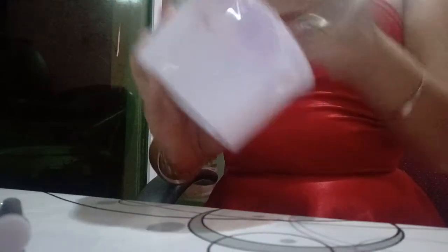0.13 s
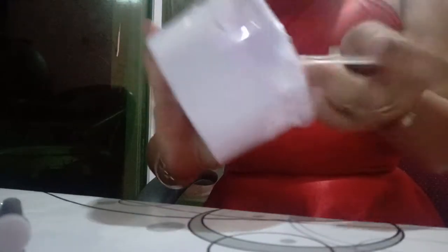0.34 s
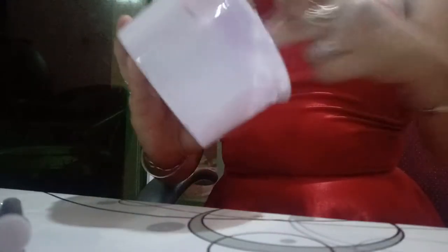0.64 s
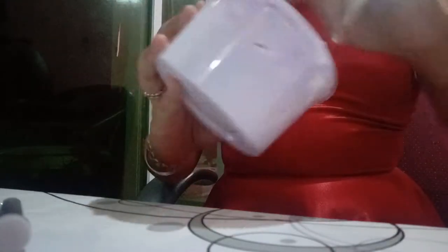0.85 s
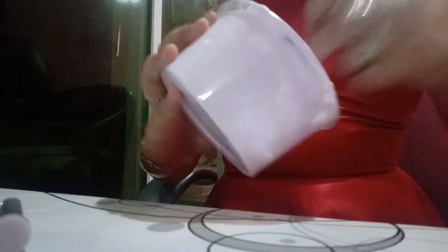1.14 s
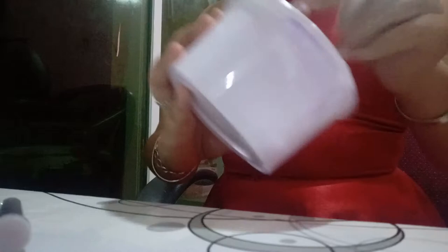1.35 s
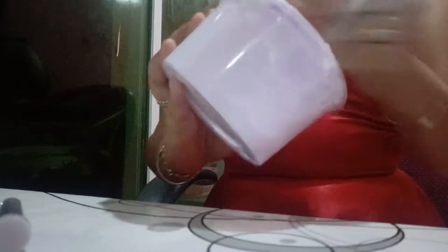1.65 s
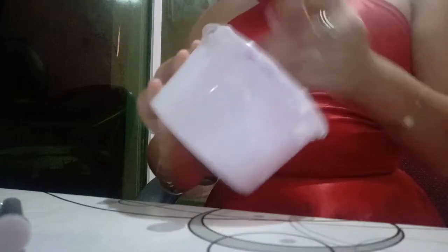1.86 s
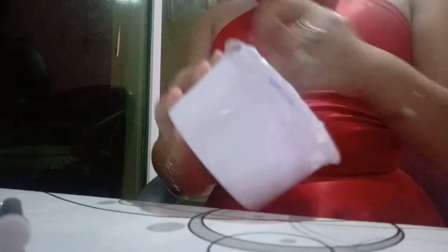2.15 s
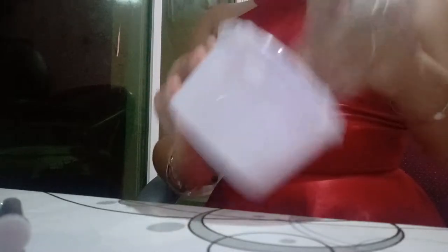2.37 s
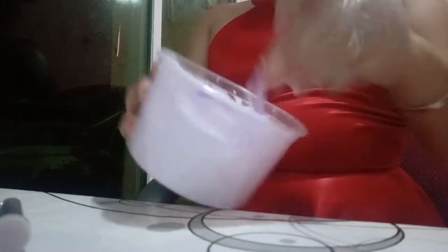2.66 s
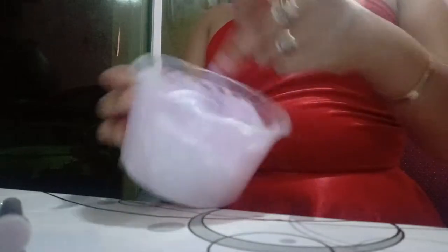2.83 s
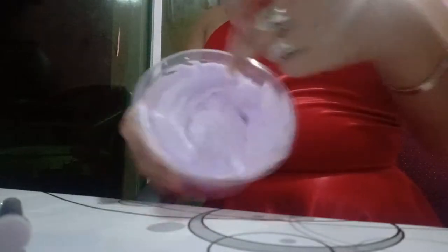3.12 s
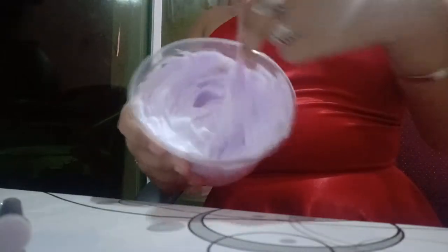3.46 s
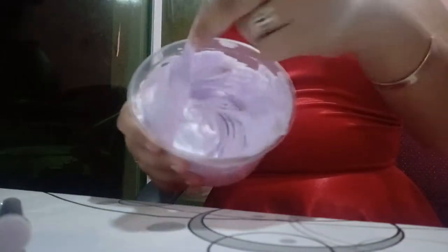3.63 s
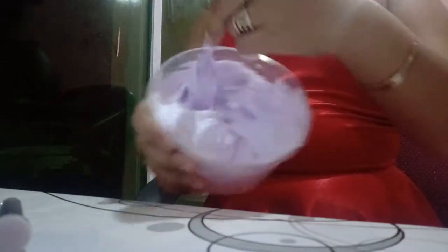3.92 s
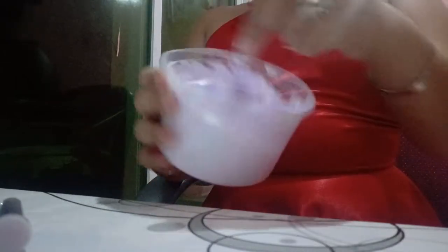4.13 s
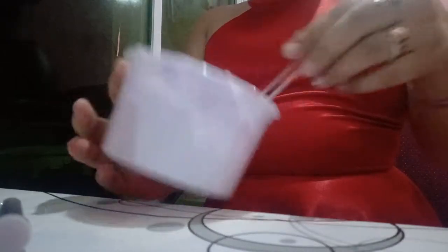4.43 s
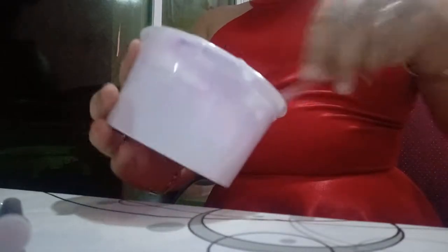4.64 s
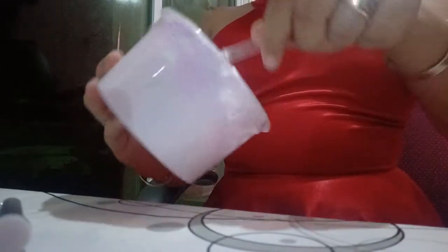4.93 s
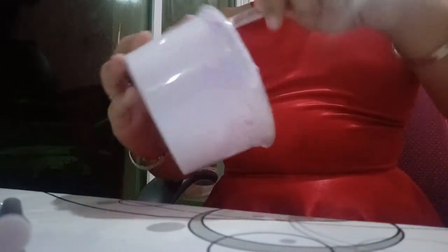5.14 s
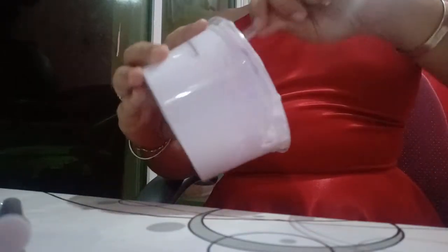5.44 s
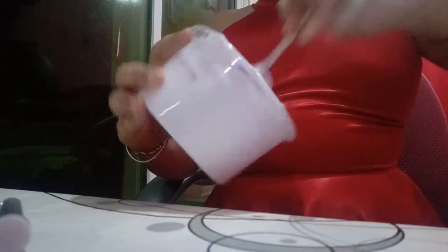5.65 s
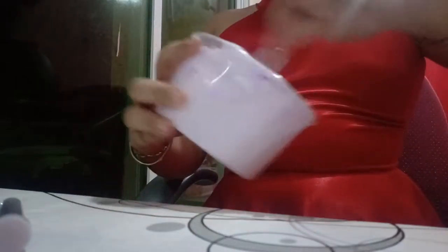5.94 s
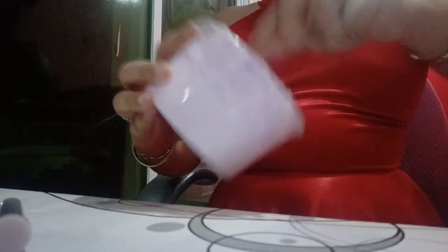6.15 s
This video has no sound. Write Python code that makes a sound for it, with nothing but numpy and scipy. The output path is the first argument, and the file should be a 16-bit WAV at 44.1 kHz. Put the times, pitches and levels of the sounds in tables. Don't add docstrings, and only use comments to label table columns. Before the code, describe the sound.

Close to a phone in a small room, a plastic spoon works sticky slime in a thin tub. Gentle dragging crackle and ticks come first over a low fan hum. Stirring quickens into hollow knocks, snapping air pockets, heavy flops and wet gurgles, with one last sharp crack. Quiet sweeps and sparse ticks follow, picking up slightly at the end.

```python
import sys
import numpy as np
from scipy import signal
from scipy.fft import rfft, irfft, next_fast_len
from scipy.io import wavfile
from scipy.ndimage import uniform_filter1d

SR = 44100
rng = np.random.default_rng(int(sys.argv[2]) if len(sys.argv) > 2 else 0)


def wrap_up_sound(samples):
    columns = np.atleast_2d(samples).T
    tamed = np.clip(columns, -1, 1)
    steps = np.round(tamed * 32767).astype(np.int16)
    wavfile.write(sys.argv[1], SR, steps)


def magnitude_from_level(level_db):
    exponent = np.asarray(level_db, float) / 20
    return 10 ** exponent


N = 277168

# start in seconds, peak in dB, wall ring in Hz, rim in dB, snap in dB.
KNOCK_EVENTS = [(-0.002, -6, 835, -35, -25.5), (0.024, -15, 910, -59, -26), (0.198, -23, 930, -60, -49),
                (0.281, -16, 833, -38, -30), (1.449, -11.5, 915, -22, -20.5), (1.529, -17, 1080, -42, -27),
                (1.736, -7.5, 748, -18, -15.5), (2.067, -2, 720, -12.5, -16.5), (2.217, -12, 924, -25, -12),
                (2.381, -8, 703, -17.5, -21), (2.404, -4, 628, -12, -20), (2.6504, -4.5, 660, -16.5, -14),
                (2.69, -18.5, 900, -32.5, -20), (2.797, -24, 926, -37.5, -39), (2.937, -20, 570, -51, -51),
                (3.06, -21.5, 661, -23.5, -34), (3.432, -11, 832, -14, -21), (3.4752, -27, 800, -81, -18),
                (3.5, -13.5, 693, -33, -45), (3.795, -13, 680, -28.5, -21), (3.856, -25, 679, -24.5, -21.5),
                (3.8679, -22.5, 1200, -31, -29), (3.8877, -19, 1200, -20, -10),
                (6.074, -30, 800, -25.5, -29)]
# frequency in Hz, width in Hz, level in dB.
RIM_MODES = [(2189, 400, 5.5), (2540, 830, 5.5), (3150, 78, -3.5)]


def level(x, db):
    return x * magnitude_from_level(db) / np.sqrt(np.mean(x ** 2))


def band(x, hz, width):
    return signal.lfilter(*signal.iirpeak(hz, hz / width, fs=SR), x)


def narrow(x, hz, width):
    return band(band(x, hz, width), hz, width)


def colour(x, table, share=1, turn=((1, 0),)):
    size = next_fast_len(x.shape[-1] + 4096)
    octave = np.log(np.fft.rfftfreq(size, 1 / SR) + 1)
    hz, db = np.transpose(table)
    gain_db = np.interp(octave, np.log(hz), db)
    hz, radians = np.transpose(turn)
    phase = np.interp(octave, np.log(hz), radians)
    return irfft(rfft(x, size) * magnitude_from_level(share * gain_db) * np.exp(1j * phase), size)[..., :x.shape[-1]]


def onset(s):
    return int((s + 0.0012) * SR)


def decay(t, t60):
    return np.exp(-np.log(1000) * t / t60)


def ring(t, hz, t60, rise, phase, sag=0.):
    lag = t - 0.0012 * (1 - np.exp(-t / 0.0015))
    turns = hz * (t - sag * lag)
    return (1 - np.exp(-t / rise)) * decay(t, t60) * np.sin(2 * np.pi * turns + phase)


def walk(rate):
    k = int(SR / rate)
    return uniform_filter1d(np.repeat(rng.standard_normal(N // k + 1), k), k)[:N]


def swells(rows, db, rest_db):
    s, rise, fall = np.array(rows)[:, :3, None].transpose(1, 0, 2)
    t = np.arange(0, N, 32) / SR
    slope = np.where(t < s, (s - t) / rise, (t - s) / fall)
    power = np.sum(magnitude_from_level(db[:, None] - 20 * slope) ** 2, axis=0)
    return np.interp(np.arange(N) / SR, t, np.sqrt(power + magnitude_from_level(rest_db) ** 2))


def motor(hz, width):
    x = band(rng.standard_normal(N), hz, width)
    envelope = uniform_filter1d(np.abs(x), int(4 * SR / hz)) + 1e-9
    return x / envelope ** 0.13


def background():
    # frequency in Hz, width in Hz, level in dB.
    motor_tones = [(120.64, 3.7, -60), (168, 13, -68), (238, 4.3, -74.5), (349.7, 5, -70.5),
                   (600, 8.8, -77.5)]
    # frequency in Hz, density in dB per Hz.
    hiss_colour = [(15, -14), (30, -26.5), (55, -7), (120, -4.5), (216, -16.5), (400, -22), (700, -12),
                   (1500, -21.5), (2200, -17), (3500, -28), (5100, -35.5), (7000, -38.5), (10000, -39.5),
                   (14000, -38)]
    hum = sum(level(motor(hz, width), db) for hz, width, db in motor_tones)
    hum = np.array([np.roll(hum, 8), hum])
    mid, side = colour(rng.standard_normal((2, N)), hiss_colour)
    side = signal.lfilter(*signal.butter(1, 450, "high", fs=SR), side)
    hiss = level(np.array([mid + side, mid - side]), -64)
    return (hum + hiss) * magnitude_from_level(np.array([[-1.2], [1.2]]))


def room(x):
    t60_s, level_db, dull_hz = 0.19, -19.5, 3720
    t = np.arange(SR // 2) / SR
    tail = rng.standard_normal((2, len(t))) * decay(t, t60_s) * (t > 0.003)
    tail = signal.lfilter(*signal.butter(1, dull_hz, fs=SR), tail)
    tail /= np.sqrt(np.sum(tail ** 2, axis=1, keepdims=True))
    return magnitude_from_level(level_db) * signal.fftconvolve(x, tail, axes=1)[:, :N]


def swishes():
    # peak in seconds, rise in seconds, fall in seconds, level in dB, centre in Hz.
    strokes = [
        (0.55, 0.22, 0.18, -54, 5280),
        (1.0, 0.15, 0.26, -55.5, 5200),
        (1.27, 0.12, 0.037, -60, 5410),
        (1.5, 0.057, .1, -53, 4940),
        (1.6, 0.083, 0.098, -64.5, 5200),
        (4.42, 0.1, 0.064, -69, 4930),
        (4.76, 0.073, .12, -67.5, 4696),
        (5.3, .25, 0.36, -69, 4920),
        (5.45, .15, 0.11, -69.5, 5300),
    ]
    air = rng.standard_normal((3, N))
    air = air[:2] + air[2]
    out = 0
    for row in strokes:
        swish = level(narrow(air, row[4], 800), 0)
        out = out + swish * swells([row], np.array(row[3:4]), -120)
    return out * magnitude_from_level(np.array([[-3], [3]]))


def slump():
    # peak in seconds, rise in seconds, fall in seconds, level in dB.
    slides = [
        (2.414, 0.03, 0.17, -43),
        (2.658, 0.0072, 0.084, -39.5),
        (2.941, 0.09, 0.027, -61),
        (3.059, 0.12, 0.27, -45.5),
    ]
    wobble = band(band(rng.standard_normal(N), 120, 130), 100, 134)
    return level(wobble, -1.2) * swells(slides, np.transpose(slides)[3], -75.5)


def flops():
    # start in seconds, peak in dB.
    lump_hits = [(1.449, -36), (2.029, -42.5), (2.404, -2), (2.407, -10), (2.469, -43), (2.6504, -2),
                 (2.653, -12), (2.69, -21), (2.905, -21), (2.937, -23.5), (2.944, -18), (3.061, -32),
                 (3.432, -39), (3.888, -24.5)]
    # frequency in Hz, level in dB, t60 in seconds.
    swing_modes = [(310, 2, 0.02), (433, -1, 0.019), (198, -1, 0.012)]
    rows = lump_hits + [(row[0], row[1] - 29.5) for row in KNOCK_EVENTS[1:]]
    out, t = np.zeros(N + 4096), np.arange(4096) / SR
    for (s, peak_db), chance in zip(rows, rng.standard_normal((len(rows), 3))):
        swing = sum(magnitude_from_level(db) * ring(t, hz * (1 + 0.011 * chance[k]), t60, 0.011, 1.67 * k)
                    for k, (hz, db, t60) in enumerate(swing_modes))
        i = onset(s)
        out[i:i + 4096] += magnitude_from_level(peak_db + 9.0) * swing
    return out[:N]


def pings():
    # start in seconds, peak in dB, frequency in Hz, t60 in seconds.
    ping_modes = [(0.35, -36.5, 3150, 0.0099), (1.449, -49, 1240, 0.04), (1.79, -33, 3520, 0.0084),
                  (2.152, -30, 2840, 0.0094), (2.217, -24, 4920, 0.012), (2.405, -16, 1270, 0.011),
                  (2.65, -14, 1240, 0.0077), (2.691, -23.5, 2510, 0.0078), (3.432, -21, 2260, 0.011),
                  (3.468, -26, 4240, 0.0066), (3.4976, -36, 796, 0.013), (3.4758, -21, 1200, 0.0053),
                  (3.8884, -6.5, 2026, 0.0062), (2.0669, -20.5, 1930, 0.012), (3.856, -27, 1240, 0.0088),
                  (3.871, -30, 715, 0.0077), (3.8715, -31.5, 4860, .006), (4.3465, -46.5, 1150, .012),
                  (4.3465, -55, 4100, .01), (1.1716, -39, 1000, 0.0084), (3.8879, -21.5, 4390, 0.0046),
                  (0.7245, -47, 990, 0.0062), (1.527, -29.5, 2230, 0.0097), (3.0605, -27.5, 927, 0.016),
                  (4.502, -31, 1200, 0.0086), (4.502, -42, 2353, 0.0066), (5.775, -34.5, 5240, 0.008),
                  (5.872, -38, 2050, 0.0074), (6.075, -31.5, 960, 0.0063), (6.088, -38, 930, 0.016)]
    out, t = np.zeros(N + 2048), np.arange(2048) / SR
    for s, peak_db, hz, t60 in ping_modes:
        i = onset(s)
        out[i:i + 2048] -= magnitude_from_level(peak_db + 9.0) * ring(t, hz, t60, 0.00061, 0.)
    return out[:N]


def crackle(rate, scatter_db):
    size_db = scatter_db * np.minimum(rng.exponential(size=N), 3.1)
    hit = (rng.random(N) < rate / SR) * magnitude_from_level(size_db)
    return signal.lfilter([1], [1, -0.97], hit) * rng.standard_normal(N)


def drag():
    # peak, rise and fall in seconds, level in dB, brightness in dB.
    sweeps = [(0.08, 0.42, 0.24, -54.5, -1.5), (0.57, 0.34, 0.17, -54, 2.5),
              (0.63, 0.44, 0.038, -47.5, -15), (0.8, 0.9, 0.13, -57.5, -10),
              (0.98, 0.13, 0.79, -58.5, -0.5), (1.17, 0.15, 0.13, -45, -4), (1.6, 0.056, 0.089, -53.5, -4),
              (1.95, 0.12, 0.55, -57.5, 0.5), (2.13, 0.034, 0.36, -44, -3),
              (2.31, 0.046, 0.11, -48.5, -1.5), (2.56, 0.22, 0.73, -61, 3), (3.05, 0.55, 0.19, -66, 5.5),
              (4.0, 0.28, 0.23, -62, 5.5), (4.3, 0.51, 0.84, -73.5, -2), (4.76, 0.0944, 0.15, -67.5, -4),
              (5.25, 0.12, 0.49, -63.5, 0), (5.42, 0.56, 0.1, -60, -17.5), (5.8, 0.014, 0.066, -76, 13.5),
              (5.93, 0.18, 0.12, -59, 0), (6.09, 0.087, 0.16, -48.5, -5.5), (6.23, 0.17, 0.28, -56, -2),
              (6.135, 0.12, 0.058, -46.5, -14)]
    # peak, rise and fall in seconds, level in dB, brightness in dB.
    tugs = [(0.001, 0.0105, 0.045, -38.5, -8), (1.459, 0.0085, 0.08, -51.5, 6),
            (1.511, 0.029, 0.037, -42, -1), (1.75, 0.0125, 0.18, -46.5, -7.5),
            (1.827, 0.12, 0.025, -43.5, -4.5), (2.06, 0.11, 0.071, -45, -7), (2.39, 0.017, 0.02, -46, -1),
            (2.489, 0.11, 0.045, -44.5, -1.5), (2.66, 0.0071, 0.2, -51.5, -6),
            (2.801, 0.059, 0.016, -32.5, -10), (2.884, 0.2, 0.094, -55.5, -6.5),
            (2.945, 0.038, 0.094, -51.5, -1.5), (3.128, 0.051, 0.058, -44.5, -8),
            (3.481, 0.071, 0.072, -46, -1.5), (3.84, 0.0072, 0.1, -45, -3.5),
            (3.889, 0.066, 0.05, -45, 1.5), (4.56, 0.043, 0.053, -59.5, -4.5),
            (1.8, 0.046, 0.048, -49.5, 4), (4.506, 0.015, 0.103, -52.5, -12.5),
            (5.152, 0.045, 0.056, -39.5, -13.5), (4.345, 0.011, .018, -52.5, 1),
            (4.533, 0.0049, .03, -60, 2), (1.066, .006, 0.021, -61, 8), (1.092, 0.0094, 0.018, -57.5, 8),
            (1.116, .006, .015, -56, 3.5), (1.136, 0.018, .008, -55, -11), (.978, 0.0045, 0.032, -55, -1.5),
            (1.275, .005, 0.013, -62.5, 5)]
    # peak, rise and fall in seconds, level in dB.
    gurgles = [(0.001, .01, 0.019, -31), (1.0, 1, 0.75, -63), (1.454, 0.0092, 0.081, -49),
               (1.743, 0.0083, 0.13, -45.5), (2.076, 0.011, 0.11, -40), (2.43, 0.048, 0.1, -32),
               (2.658, 0.0055, 0.11, -27.5), (2.797, 0.13, 0.068, -50), (2.911, 0.031, 0.087, -35.5),
               (2.949, 0.1, 0.027, -35.5), (3.029, 0.13, 0.2, -47.5), (3.482, 0.044, 0.036, -47),
               (3.88, 0.31, 0.2, -56), (6.07, 0.23, 0.34, -58.5)]
    # frequency in Hz, width in Hz, level in dB.
    wall_modes = [(628, 65, -3.5), (734, 110, 1.5), (930, 220, 1.5), (1170, 64, -5)]
    # frequency in Hz, width in Hz, level in dB.
    squelch_modes = [(299, 70, 0.5), (440, 140, 1), (570, 69, 1.5), (800, 270, -12), (1200, 270, -24.5)]
    # frequency in Hz, level in dB.
    fizz_colour = [(2600, -16.5), (3600, -6.5), (4350, -5), (5100, -4), (5900, -10.5), (7700, -20.5),
                   (10000, -28.5), (14000, -27)]
    # frequency in Hz, level in dB.
    froth_colour = [(1500, -16), (2600, -6), (3400, -2), (4300, -3.5), (6300, -3.5), (7200, -17),
                    (9000, -32), (14000, -33)]

    shared = crackle(1000, 3.2)
    apart = np.array([crackle(2500, 1.5), crackle(2800, 1.5)])
    force = level(shared, 0) + level(apart, -0.76)

    def body(modes):
        return sum(magnitude_from_level(db + 3.0 * walk(14)) * narrow(force, hz, 1.45 * width) for hz, width, db in modes)

    moves, rest_db = sweeps + tugs, -85
    effort_db, bright_db = np.transpose(moves)[3:]
    tug_db, tug_bright_db = np.transpose(tugs)[3:]
    layers = [
        (body(wall_modes), swells(moves, effort_db, rest_db)),
        (body(squelch_modes), swells(gurgles, np.transpose(gurgles)[3], -69)),
        (body(RIM_MODES), swells(moves, effort_db - 1 + 0.74 * bright_db, rest_db)),
        (colour(force, fizz_colour) * magnitude_from_level(2.7 * walk(16)), swells(moves, effort_db + bright_db, rest_db)),
        (colour(force, froth_colour) * magnitude_from_level(4.3 * walk(17)), swells(tugs, tug_db + tug_bright_db - 5.5, rest_db)),
    ]
    return sum(level(part, 0) * gain for part, gain in layers)


def wall_ring(t, hz, common, own):
    # ratio to the wall ring, level in dB, cycles to die.
    partials = [(1.119, 6, 10.26), (1.484, -27.5, 3.9), (1.477, -7.5, 12), (1.4, -12.5, 50)]
    gain = magnitude_from_level(2.2 * own)
    out = magnitude_from_level(-3) * gain[7] * ring(t, 1300, 0.011, 0.002, 0.5 * own[13])
    for k, (ratio, db, cycles) in enumerate(partials):
        stray = 1 + 0.074 * common[k + 8] * (k > 0)
        mode = ring(t, hz * ratio * stray, cycles / (hz * ratio), 0.0011, 0.018 * own[k + 16], 0.096)
        out = out + magnitude_from_level(db) * gain[k] * mode
    return out


def rim_ring(t, common, own):
    out = 0
    for k, (hz, _, db) in enumerate(RIM_MODES):
        phase = common[k + 4] + 0.5 * own[k + 20]
        mode = ring(t, hz * (1 + 0.07 * common[k + 20]), 0.011, 0.00025, phase)
        out = out + magnitude_from_level(db + 2.2 * own[k + 4]) * mode
    return out


def bright_snap(t, grit, common):
    # frequency in Hz, width in Hz, level in dB.
    snap_modes = [(4040, 180, 4), (5050, 515, 6.5), (5840, 580, -14.5), (13080, 9800, -33.5)]
    burst = grit * decay(t, 0.011) * (1 - np.exp(-t / 0.0003))
    first_crack = np.diff(burst * np.exp(-t / 0.0008), n=2, prepend=[0, 0])
    body = sum(magnitude_from_level(db + 1.5 * common[k]) * narrow(burst, hz, 2 * width)
               for k, (hz, width, db) in enumerate(snap_modes))
    return body + magnitude_from_level(-31.5) * first_crack


def knocks():
    # start in seconds,
    # peak in dB, wall ring in Hz, brightness in dB.
    small_bursts = [(1.154, -24, 933, -17), (1.203, -34, 1157, -7.5), (1.331, -33.5, 905, -2),
                    (1.371, -42, 1160, 8), (1.51, -28.5, 1075, -3), (1.572, -28.5, 826, 10.5),
                    (1.721, -26.5, 932, -15), (1.776, -27.5, 958, 4.5), (1.789, -32.5, 1090, 18.5),
                    (1.809, -31, 1340, -11), (1.896, -34.5, 756, 13), (1.954, -33.5, 918, 6.5),
                    (1.969, -30.5, 735, 3), (2.008, -28, 1219, -15), (2.029, -37.5, 600, 18.5),
                    (2.152, -32, 1220, 6.5), (2.195, -32.5, 1053, 17.5), (2.297, -32, 1070, 15.5),
                    (2.323, -33.5, 750, -3), (2.469, -27, 595, 7.5), (2.497, -33.5, 576, -7),
                    (2.605, -42, 1460, 14), (2.853, -37.5, 645, 0), (2.902, -26.5, 544, -21),
                    (3.003, -27.5, 625, 8.5), (3.092, -44.5, 476, 19), (3.113, -30.5, 1410, 13.5),
                    (3.135, -28.5, 1450, -20.5), (3.4665, -17.5, 700, -1), (3.836, -30, 1200, 6.5),
                    (0.089, -35, 930, 0), (0.138, -39, 764, 2), (0.159, -35, 1050, 5), (0.171, -34.5, 800, -10),
             (0.287, -33.5, 753, 13), (0.351, -39, 660, 19.5), (0.367, -36.5, 940, -2),
             (0.395, -41, 1200, -16), (0.457, -34.5, 805, 3), (0.566, -31, 860, 16),
             (0.694, -45, 695, -10.5), (0.725, -28.5, 794, 3), (0.913, -35, 830, 8.5),
             (0.977, -43, 592, 13.5), (3.77, -35, 1200, 7), (4.074, -44, 626, 11), (4.174, -39, 1045, 13),
             (4.341, -47, 1000, 14), (4.5023, -33.5, 1045, 9.5), (5.114, -34.5, 970, -19.5),
             (5.131, -41, 1010, -16), (5.146, -36, 740, -18.5), (5.157, -31.5, 756, 7),
             (5.697, -64, 802, 34.5), (5.872, -34, 760, 11), (5.92, -37, 786, 4), (6.044, -39.5, 744, 12.5),
             (6.13, -34, 1058, -8), (6.206, -26.5, 910, 2.5),
                    (3.8845, -19.5, 712, -10), (3.8884, 0.5, 1444, -12.5), (1.239, -38.5, 800, 4.5),
              (2.955, -41, 450, -13), (3.6, -48, 690, 12), (4.061, -44, 816, 21.5), (4.53, -66, 670, 3),
              (4.703, -45.5, 1143, -14), (4.886, -52.5, 620, 19.5), (5.233, -41.5, 955, 10.5),
              (5.263, -45.5, 995, 13), (6.019, -38, 740, 2), (6.099, -32.5, 960, -17),
              (6.227, -39, 840, -5)]
    # start in seconds, snap in dB.
    threads = [(3.677, -57), (4.4, -45), (4.261, -45), (0.22, -39.5), (1.626, -41), (2.2, -46),
               (0.838, -53), (0.686, -37.5), (1.3, -34), (1, -38), (5.775, -34.5)]
    rows = list(KNOCK_EVENTS)
    for s, db, hz, bright_db in small_bursts:
        rows.append((s, db, hz, db - 18 + 0.94 * bright_db, db - 13 + bright_db))
    for s, db in threads:
        rows.append((s, db - 32.5, 800, db - 32.5, db))

    lead_in = 256
    out, t = np.zeros((2, lead_in + N + 4096)), np.arange(4096) / SR
    chance = rng.standard_normal((len(rows), 2, 24))
    grit = rng.standard_normal((len(rows), 3, 4096))
    for (s, peak_db, hz, rim_db, snap_db), c, g in zip(rows, chance, grit):
        i = lead_in + onset(s)
        for port in range(2):
            wall = wall_ring(t, hz, c[0], c[port])
            rim = rim_ring(t, c[0], c[port])
            snap = bright_snap(t, g[2] + 0.8 * g[port], c[0])
            rattle = band(g[port] * decay(t, 0.035), hz, 0.9 * hz)
            out[port, i:i + 4096] += magnitude_from_level(peak_db + 0.5) * (magnitude_from_level(-18.5) * rattle - wall)
            out[port, i:i + 4096] += magnitude_from_level(rim_db - 5.0) * rim + magnitude_from_level(snap_db + 1.5) * snap
    return out[:, lead_in:lead_in + N]


def scene():
    # frequency in Hz, left minus right in dB.
    port_balance = [(100, -4), (400, -1.5), (800, -2.5), (1500, -6), (3000, -5.5), (5000, -11),
                    (9000, -3.5), (13000, 1)]
    # frequency in Hz, turn in radians.
    left_turn = [(300, -.3), (600, -.6), (860, -1.6), (1250, -.7), (1720, -1.4), (3100, -1.7), (4500, -1.6),
                 (8000, -1.1)]
    tub = knocks() + pings() + flops() + drag()
    tub = signal.lfilter(*signal.butter(4, 105, "high", fs=SR), tub) + slump()
    left = colour(tub[0], port_balance, 0.5, left_turn)
    right = colour(tub[1], port_balance, -0.5)
    near = np.array([left, right])
    return near + room(near) + background() + swishes()


def band_limit(x):
    return signal.sosfilt(signal.butter(12, 15400, fs=SR, output="sos"), x)


def record(dry):
    ceiling = 1.6
    mix = ceiling * np.tanh(dry / ceiling) + 0.00076
    return band_limit(mix)


dry = scene()
out = record(dry)
wrap_up_sound(out)
```